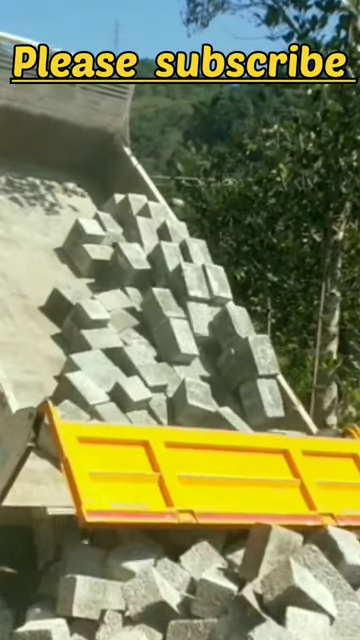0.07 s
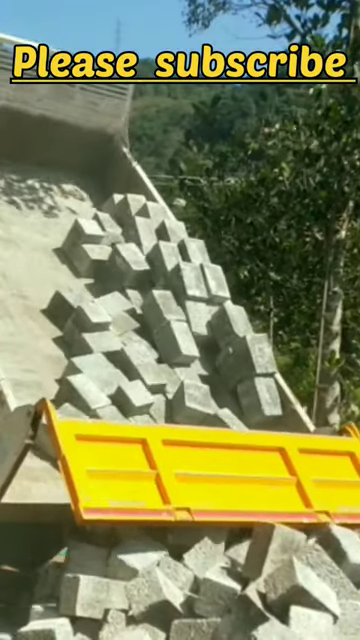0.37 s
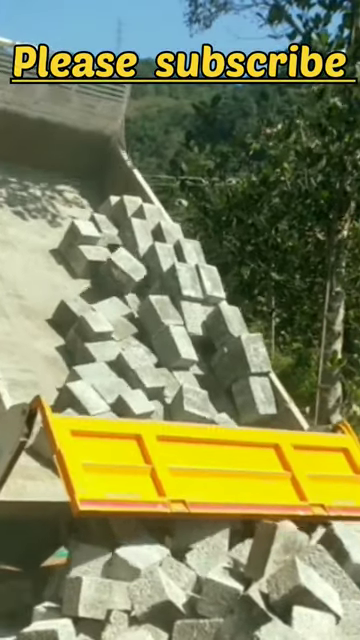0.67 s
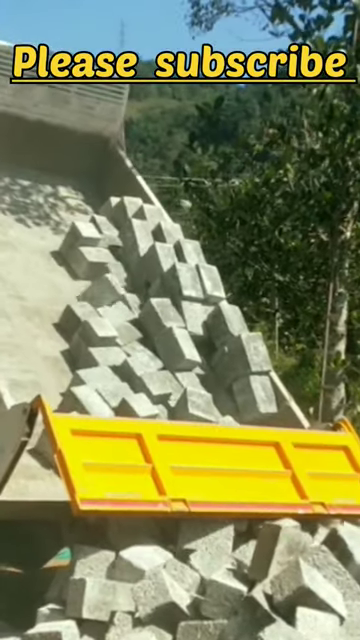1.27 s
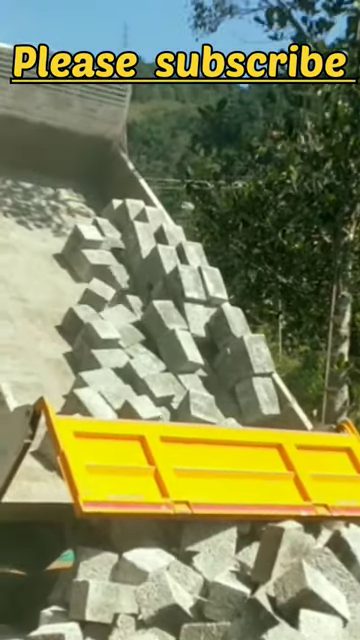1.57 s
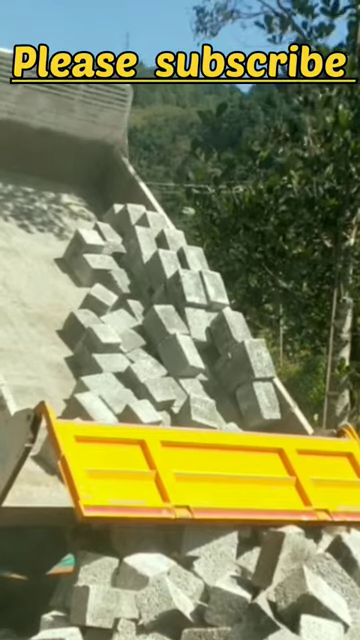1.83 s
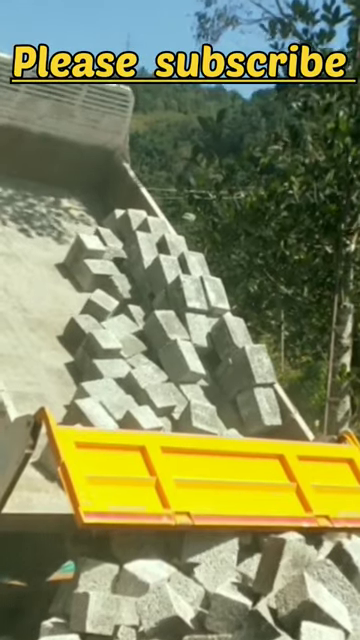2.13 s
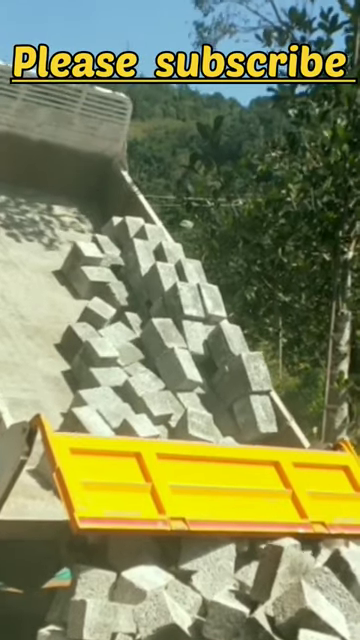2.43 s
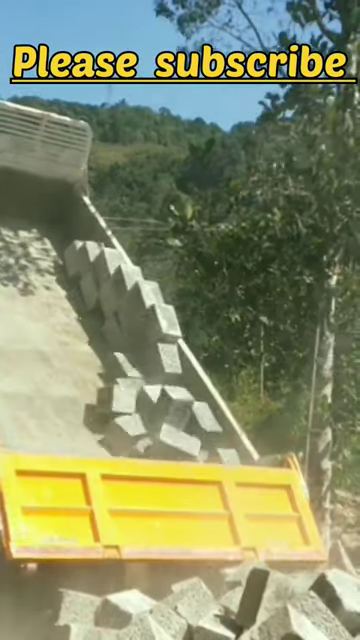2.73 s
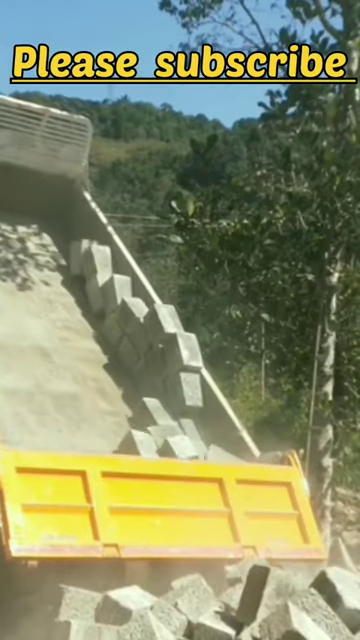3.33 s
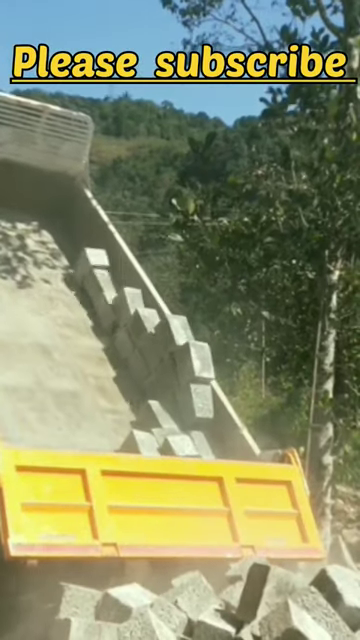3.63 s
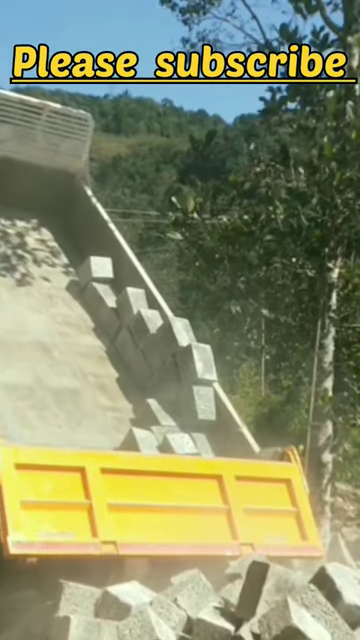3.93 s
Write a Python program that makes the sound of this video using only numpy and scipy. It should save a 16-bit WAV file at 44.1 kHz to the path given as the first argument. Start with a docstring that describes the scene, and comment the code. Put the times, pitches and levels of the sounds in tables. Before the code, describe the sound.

Concrete blocks scrape and clack down a tipper truck's steel bed outdoors, over a low idling engine, with several knocks around 1 second. The sliding stalls at about 1.8 seconds. From 2.6 seconds it builds into a louder rush of grinding, hollow booms, brief screeches and hissing grit, lasting until 4 seconds. Dull bumps hit the right microphone near the start and between 1.8 and 2.5 seconds.

```python
"""A tipper truck unloads concrete blocks

Outdoors, over the idling engine, blocks grind down the raised steel bed, stall, then rush onto a heap.
They boom on the bed, clack together and screech along the metal while grit hisses.
Dull clunks hit the right microphone."""
import sys
import numpy as np
from scipy import signal
from scipy.fft import rfft, irfft, next_fast_len
from scipy.io import wavfile
from scipy.ndimage import uniform_filter1d, map_coordinates

SR = 44100
rng = np.random.default_rng(int(sys.argv[2]) if len(sys.argv) > 2 else 0)


def dump_mix(stems):
    """Bounce the given channels to the path in sys.argv[1] as a 16-bit WAV at rate SR."""
    frames = np.atleast_2d(stems).T  # one column per channel
    limited = np.clip(frames, -1, 1)  # hard clip at full scale
    pcm = np.round(limited * 32767).astype(np.int16)
    wavfile.write(sys.argv[1], SR, pcm)


N = 176400  # 4 seconds

# blocks landing on the bed (time [s], relative level [dB], hardness [dB])
LANDINGS = [(0.819, -17, -19), (0.984, -13.5, -8), (1.128, -15, -10), (1.149, -18, -8), (1.309, -8, -19),
            (1.648, -16, -5.5), (2.825, -10, -1), (2.856, -8, -2.5), (2.995, -6.5, -3.5), (3.039, -6, -3.5),
            (3.187, -8, -27), (3.198, -13.5, 12), (3.229, -11.5, -13), (3.379, -6, -9.5),
            (3.508, -1.5, -18), (3.528, -3.5, -9.5), (3.555, -8, -12), (3.59, -6, -13), (3.804, -5.5, -2),
            (3.827, -3.5, -11), (3.847, -7.5, -10), (3.949, -2, -3.5)]
# tone of grinding concrete (frequency [Hz], level [dB])
GRIND_TONE = [(500, 6.5), (850, 2.5), (1000, 0.5), (1230, 5.5), (1450, -3), (1800, 2.5), (2050, -4.5),
              (2380, 3), (2750, -3), (3150, -6.5), (3700, -19), (5000, -0.5), (9000, -32.5), (14000, -37)]
# brighter tone of concrete rasping on steel (frequency [Hz], level [dB])
RASP_TONE = [(2000, -3.5), (3600, -5.5), (4300, -5), (4850, 0.5), (5350, 3.5), (5900, -1.5), (6500, -10.5),
             (7300, -49), (10000, -80)]


def amp(db):
    """Turn decibels into a gain to multiply by."""
    return 10 ** (np.asarray(db) / 20)


def unit(x):
    """Scale a sound to an average strength (rms) of 1."""
    return x / np.sqrt(np.mean(x ** 2) + 1e-20)


def along(points, hz):
    """Read between (frequency, value) points on a logarithmic frequency scale."""
    freqs, values = np.transpose(points)
    return np.interp(np.log(hz + 1), np.log(freqs + 1), values)


def curve(points):
    """Join (time, value) points with straight lines, one value per sample."""
    return np.interp(np.arange(N) / SR, *np.transpose(points))


def wobble(per_s):
    """A smooth curve through per_s random values each second."""
    return map_coordinates(rng.standard_normal(N // 20), [np.arange(N) * per_s / SR], mode="mirror")


def noise(n):
    """Two unrelated streams of white noise, n samples each."""
    return rng.standard_normal((2, n))


def filtered(x, response):
    """Multiply each frequency in a sound by response(frequency)."""
    n = x.shape[-1]
    padded = next_fast_len(n + SR // 10)
    return irfft(rfft(x, padded) * response(np.fft.rfftfreq(padded, 1 / SR)), padded)[..., :n]


def add(track, s, sound):
    """Mix a sound into a track at s seconds."""
    part = track[..., max(round(s * SR), 0):][..., :sound.shape[-1]]
    part += sound[..., :part.shape[-1]]


def fade(t, ring_s):
    """A fade that falls by 60 dB in the ring time."""
    return np.exp(-np.log(1000) * t / ring_s)


def spread(pair, tone):
    """Give two unrelated signals a tone and blend them to stereo, the middle pitches nearly mono."""
    # how alike left and right are (frequency [Hz], likeness [0-1])
    likeness = [(30, 0.076), (140, 0.77), (650, 0.98), (1200, 0.94), (2400, 0.29), (5000, 0.15),
                (12000, 0.093)]

    def blend(hz):
        angle = np.arccos(np.clip(along(likeness, hz), -1, 1)) / 2
        return amp(along(tone, hz)) * [np.cos(angle), np.sin(angle)]

    mid, side = filtered(pair, blend)
    return unit(np.array([mid + side, mid - side]))


def ring(modes, t, scatter_db):
    """An object's fading natural tones (modes), one per row, as if struck at a random spot."""
    hz, db, ring_s = np.transpose(modes)[:, :, None]
    size = amp(db + scatter_db * rng.uniform(-1, 1, hz.shape)) * rng.choice([-1, 1], hz.shape)
    build_up = 1 - np.exp(-t / 0.00069)
    return size * fade(t, ring_s) * build_up * np.sin(2 * np.pi * hz * t)


def engine():
    """The idling engine fires with an uneven low hum, over exhaust rumble and steady noise."""
    # tones of the hum (multiple of the firing rate, level [dB])
    harmonics = [(1, -19), (2, 1), (3, -9), (4, -6)]
    # loudness of hum and exhaust (time [s], relative level [dB])
    loudness = [(0, -32.5), (.8, -32), (1.2, -35.5), (2.75, -51), (3.0, -35), (4, -47)]
    # tone of the steady noise (frequency [Hz], level [dB])
    idle_tone = [(25, -2), (200, 2.5), (420, -27), (740, -13), (950, -38), (14000, -62)]
    # tone of the exhaust (frequency [Hz], level [dB])
    exhaust_tone = [(28, -28), (45, 1), (75, 4), (120, 13.0), (220, -12), (600, -138)]
    firing_hz = 39.9
    phase = 2 * np.pi * np.cumsum(firing_hz * (1 + 0.02 * wobble(13))) / SR
    hum = unit(sum(amp(db + 5.4 * wobble(21.93)) * np.sin(k * phase) for k, db in harmonics))
    exhaust = spread(noise(N), exhaust_tone)
    steady = amp(-40.5) * spread(noise(N), idle_tone)
    return amp(curve(loudness)) * (0.62 * hum + 0.7 * exhaust) + steady


def friction(tone, patchy_db):
    """Rubbing noise flares in patches of pitch as contacts come and go, and makes the steel ring."""
    spectrum = signal.stft(noise(N), nperseg=256)[2]
    patches = uniform_filter1d(rng.standard_normal(spectrum.shape[1:]), size=3, axis=0)  # across pitch
    patches = uniform_filter1d(patches, size=8, axis=1)  # across time
    rub = signal.istft(spectrum * amp(patchy_db * np.clip(unit(patches), -2, 2)))[1][:, :N]
    t = np.arange(SR // 5) / SR
    steel = noise(len(t)) * fade(t, ring_s=0.18)
    ringing = signal.fftconvolve(rub, steel, axes=1)[:, :N]
    return spread(unit(rub) + 0.7 * unit(ringing), tone)


def stone(t, pitch):
    """The short ring of one block; smaller blocks ring higher."""
    # natural tones of a usual block (frequency [Hz], level [dB], ring time [s])
    block_modes = [(1194, 5, 0.067), (1386, -7, 0.065), (1790, 4.5, 0.17), (2237, 5.5, 0.14),
                   (2770, -9, .025), (5030, 5, 0.0063)]
    return unit(ring(np.array(block_modes) * [pitch, 1, 1], t, scatter_db=4).sum(0))


def tumbling():
    """Jostling blocks make many small knocks, each a ring and a chipping noise."""
    knocks_per_s = 70
    out, t = np.zeros((2, N)), np.arange(SR // 20) / SR
    chip_band = signal.butter(4, [700, 5600], "band", fs=SR)
    for slot in range(int(knocks_per_s * N / SR)):
        size = amp(3 * rng.uniform(-0.041, 1)) * rng.uniform(0.13, 1, (2, 1))
        chips = unit(signal.lfilter(*chip_band, noise(len(t))) * np.exp(-t / 0.01))
        s = (slot + rng.uniform(0, 2)) / knocks_per_s
        pitch = np.exp(0.1 * rng.standard_normal())
        add(out, s, size * (stone(t, pitch) + 0.19 * chips))
    return unit(out)


def grains(n, per_s, scatter_db):
    """Two unrelated streams of tiny clicks; scatter_db makes their sizes uneven."""
    hit = rng.random((2, n)) < per_s / SR
    return hit * rng.choice([-1, 1], hit.shape) * amp(scatter_db * np.clip(noise(n), -2, 2))


def sliding():
    """The moving load shakes the bed, grinds, rasps on the steel and sheds grit."""
    # grinding before the stall, as it restarts, and in the rush (time [s], relative level [dB])
    first_slide = [(0.0, -36), (0.22, -41), (0.766, -26), (0.952, -31.5), (1.012, -23.5), (1.1, -31),
                   (1.15, -28.5), (1.24, -38.5), (1.285, -39), (1.308, -32), (1.362, -35.5), (1.49, -41.5),
                   (1.61, -35), (1.68, -38), (1.758, -45.5), (1.8, -57)]
    restart = [(1.86, -59), (2.1, -66.5), (2.5, -59.5), (2.6, -39.5), (2.819, -29.5)]
    rush = [(2.835, -24), (3.129, -26.5), (3.219, -22), (3.911, -27.5), (3.944, -19.5), (3.965, -26),
            (4.0, -26)]
    # loudness of the bed's rumble and the grit's hiss (time [s], relative level [dB])
    rumble_levels = [(0, -34.5), (.85, -29.5), (1.26, -39.5), (1.36, -31.5), (1.66, -37.5), (1.79, -44),
                     (2.5, -51.5), (2.7, -34.5), (2.9, -34), (3.01, -25.5), (3.8, -26)]
    grit_levels = [(0, -63), (.3, -60), (.45, -50), (1.27, -47.5), (1.58, -41), (1.85, -69), (2.45, -66.5),
                   (2.9, -44), (3.42, -35.5), (3.65, -46.5), (4, -50.5)]
    # tone of the rumble and the hiss (frequency [Hz], level [dB])
    rumble_tone = [(50, -26), (90, -11.5), (125, -5), (165, -1.5), (225, 3.5), (295, 3.5), (380, -2.5),
                   (450, -7.5), (560, 1), (660, -3.5), (750, 1), (860, -18), (1300, -58), (3000, -85)]
    grit_tone = [(3000, -6), (6500, 12), (9500, 1), (15000, 3.5)]
    grind_db = curve([*first_slide, *restart, *rush])
    judder_db = 0.69 * wobble(55)  # all four layers shake together
    rumble = amp(curve(rumble_levels) + 2.5 + judder_db) * friction(rumble_tone, patchy_db=2.5)
    jostle = friction(GRIND_TONE, patchy_db=2.5) + amp(-5.5) * tumbling()
    grind = amp(grind_db + 2.5 + judder_db) * jostle
    rasp = amp(grind_db - 3.5 + judder_db) * friction(RASP_TONE, patchy_db=7.5)
    hiss = friction(grit_tone, patchy_db=5.5)
    ticks = spread(grains(N, per_s=2300, scatter_db=3.5), grit_tone)
    grit = amp(curve(grit_levels) + 3.0 + judder_db + 1.5 * wobble(24.7)) * unit(hiss + 1.04 * ticks)
    return rumble + grind + rasp + grit


def whistles():
    """Faint, thin, very high whistles that sink a little in pitch."""
    # whistles (time [s], length [s], starting pitch [Hz], level [dB])
    thin_whistles = [(0, .2, 14750, -54), (.19, .79, 14080, -47), (1.53, .1, 7450, -49),
                     (2.45, .36, 14250, -64)]
    sag_hz = 280
    out = np.zeros(N)
    for s, length, hz, db in thin_whistles:
        n = int(length * SR)
        pitch = hz - sag_hz * np.arange(n) / n + 45 * wobble(300)[:n] + 25 * wobble(15)[:n]
        loudness = amp(db + 1.5 * wobble(60)[:n]) * signal.windows.tukey(n, .1)
        add(out, s, loudness * np.sin(2 * np.pi * np.cumsum(pitch) / SR))
    return out


def clunks():
    """Dull knocks on the right microphone alone: one push, then a short rough rattle."""
    # knocks (time [s], relative level [dB], pitch [Hz], looseness [0-1])
    knocks = [(0.086, -16.5, 75, 0.5), (0.263, -15, 100, .4), (0.386, -11.5, 300, 0.7),
              (1.763, -15, 80, 0.4), (1.934, -18, 102, 0.26), (2.073, -20, 169, 0.7),
              (2.152, -19, 128, 0.97), (2.201, -14, 238, 0.27), (2.504, -12.5, 161, 0.4),
              (2.531, -19, 85, 0.7)]
    # tone of the rattle (frequency [Hz], level [dB])
    rattle_tone = [(100, 4.5), (280, -1), (680, -15.5), (1200, -57)]
    rise_s, decay_s = 0.0053, 0.033
    out, t = np.zeros((2, N)), np.arange(-SR // 50, SR // 10) / SR
    for s, db, hz, looseness in knocks:
        from_peak = (np.pi * hz * t) ** 2
        push = (1 - 2 * from_peak) * np.exp(-from_peak)  # one bump with a dip on each side
        shake = filtered(rng.standard_normal(len(t)), lambda f: amp(along(rattle_tone, f)))
        rattle = unit(shake) * np.exp(-np.maximum(t / decay_s, -t / rise_s))
        add(out[1], s + t[0], amp(db + 0.5) * (push + looseness * amp(-2) * rattle))
    return out


def scrapes():
    """Rough concrete catches and slips many times a second; each slip is a short rasp."""
    # a block's face dragging down the floor (time [s], length [s], relative level [dB])
    drags = [(0.363, 0.14, -34.5), (0.541, 0.17, -43), (1.349, .33, -38)]
    out, t = np.zeros((2, N)), np.arange(SR // 100) / SR
    for s, length, db in drags:
        clicks = abs(grains(SR // 2, per_s=510, scatter_db=0))
        slips = signal.fftconvolve(clicks, np.exp(-t / 0.0016)[None], axes=1)
        rasp = spread(slips * noise(slips.shape[1]), RASP_TONE)[:, :int(length * SR)]
        add(out, s, amp(db - 0.5) * rasp * signal.windows.tukey(rasp.shape[1], .5))
    return out


def clacks():
    """Blocks knock together: a short stony ring and a crunch of crumbs."""
    # block against block (time [s], peak level [dB], pitch [times the usual block's])
    knocks = [(0.712, -15, 0.98), (1.014, -17, 1.2), (1.302, -20, 1.23), (1.427, -18, 1.07),
              (2.829, -12.5, .95), (3.879, -9.5, 1.01), (3.935, -4.5, 1)]
    out, t = np.zeros((2, N)), np.arange(SR // 10) / SR
    for s, db, pitch in knocks:
        crunch = spread(noise(len(t)), GRIND_TONE) * np.exp(-t / 0.014)
        clack = stone(t, pitch) * np.exp(-t / 0.03) + 0.5 * unit(crunch)
        add(out, s, amp(db) * clack / abs(clack).max())
    return out


def booms():
    """A landing block rings the bed and rocks on its corners; hard blows bring out the higher tones."""
    # natural tones of the steel bed (frequency [Hz], level [dB], ring time [s])
    bed_modes = [(125.5, -14, 0.092), (185.4, -9.5, 0.14), (227.5, -0.5, 0.096), (246.5, -2.5, 0.14),
                 (296.2, 2, 0.087), (342, -4, 0.097), (393, -6, 0.073), (522.8, -6, 0.19),
                 (580.6, -2, 0.094), (725.4, -8, 0.17), (997, -13, 0.11), (1179, -7.5, 0.048)]
    hard_above_hz, rebound_s = 430, .012
    out, t = np.zeros(N), np.arange(SR // 4) / SR
    is_high = np.array(bed_modes)[:, 0] > hard_above_hz
    for s, db, hard_db in LANDINGS:
        # the bed's tones shift a little with the load
        modes = [(hz * (1 + .025 * rng.standard_normal()), *rest) for hz, *rest in bed_modes]
        tone = amp(is_high * (hard_db + 8.0)) @ ring(modes, t, scatter_db=1.5)
        boom = tone.copy()
        rebound_times = rebound_s * np.cumsum(rng.uniform(0.4825, 1.5, size=3))
        for k, delay in enumerate(rebound_times):
            add(boom, delay, 0.73 * 0.64 ** k * tone)  # each rebound is weaker
        add(out, s, amp(db - 1.5) * boom / abs(boom).max())
    return out


def cracks():
    """Each landing starts with a bright crunch of crushed concrete."""
    out, t = np.zeros((2, N)), np.arange(SR // 10) / SR
    for s, db, _ in LANDINGS:
        crunch = spread(noise(len(t)), GRIND_TONE) + 0.84 * spread(noise(len(t)), RASP_TONE)
        add(out, s, amp(db - 20) * crunch * np.exp(-t / 0.02))
    return out


def screeches():
    """An edge catches on the steel and sings briefly in a narrow band of pitch."""
    # catching edges (time [s], length [s], pitch [Hz], band width [Hz], relative level [dB])
    catches = [(0.996, 0.063, 2370, 300, -26), (1.12, .03, 4120, 300, -35.5),
               (2.915, 0.034, 5370, 300, -23.5), (3.596, 0.0164, 5270, 500, -25.5),
               (3.74, 0.071, 5110, 730, -22)]
    out = np.zeros((2, N))
    for s, length, hz, width, db in catches:
        n = int(length * SR)
        band = filtered(noise(SR // 5), lambda f: 1 / (1 + (2 * (f - hz) / width) ** 2))[:, :n]
        add(out, s, amp(db + 3.0) * unit(band) * signal.windows.tukey(n, .35))
    return out


def creep():
    """Light rubbing at a few pitches, always there but uncovered as the stalled load inches forward."""
    # loudness of the rubbing (time [s], relative level [dB])
    loudness = [(1.7, -57), (1.87, -52.5), (2.1, -52.5), (2.25, -45.5), (2.55, -44.5)]
    # pitches that the rubbing rings (frequency [Hz], level [dB])
    peaks = [(1300, -4), (1850, -3), (2300, -1.5), (2750, -11), (5400, -4)]
    width = 0.073  # share of each peak's frequency

    def tone(f):
        return sum(amp(db) * np.exp(-((f - hz) / (width * hz)) ** 2 / 2) for hz, db in peaks)

    lean_right = amp([[-2.5], [1.5]])
    return amp(curve(loudness) + 2.1 * wobble(60)) * lean_right * unit(filtered(noise(N), tone))


def yard_echo(x):
    """A short scattered echo from the heap and the trees."""
    # how long the echo lasts (frequency [Hz], ring time [s])
    ring_times = [(150, 0.083), (1500, 0.5), (10000, 0.7)]
    hz, t, spectrum = signal.stft(noise(SR // 2), SR, nperseg=256)
    tail = signal.istft(spectrum * fade(t, along(ring_times, hz)[:, None]), SR)[1]
    return signal.fftconvolve(x, tail / np.linalg.norm(tail[0]), axes=1)[:, :N]


def scene():
    """Mix everything; the truck's sound reaches the right microphone a moment before the left."""
    knocks = booms() + cracks() + clacks() + screeches()
    truck = knocks + amp(-14.5) * yard_echo(knocks)
    truck = truck + sliding() + scrapes() + creep() + engine() + whistles()
    right_lead_s = .00009
    delay_s = np.array([[0.5], [-0.5]]) * right_lead_s
    return filtered(truck, lambda hz: np.exp(-2j * np.pi * hz * delay_s)) + clunks()


def record(dry):
    """The camera rounds off the highest peaks, thins the deepest bass and cuts the very top treble."""
    peak_limit, bass_hz, top_hz = .9, 40, 15500
    rounded = dry / (1 + (dry / peak_limit) ** 8) ** (1 / 8)
    return filtered(rounded, lambda hz: (hz < top_hz) * hz ** 2 / np.sqrt(hz ** 4 + bass_hz ** 4))


dry = scene()
out = record(dry)
dump_mix(out)
```